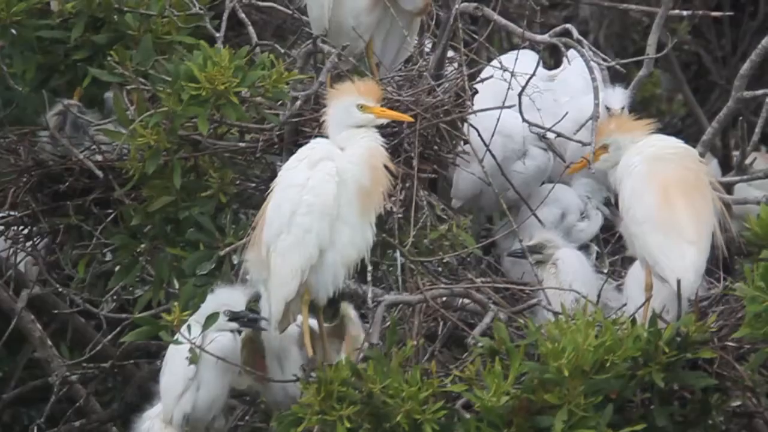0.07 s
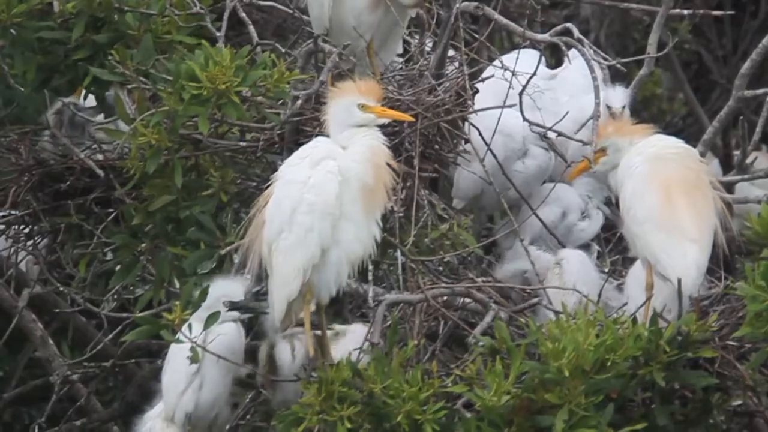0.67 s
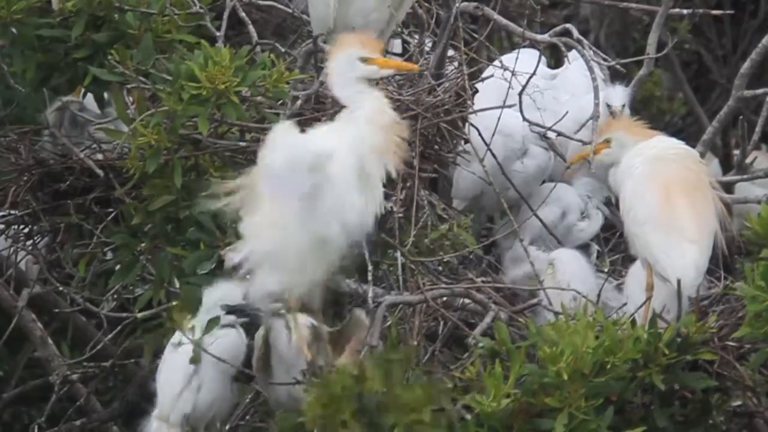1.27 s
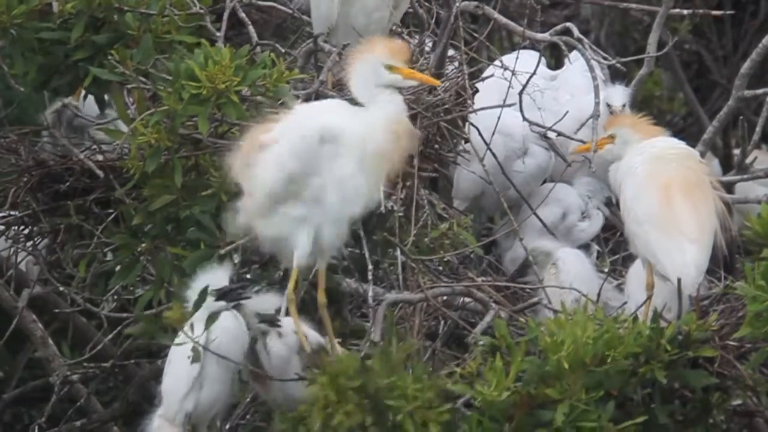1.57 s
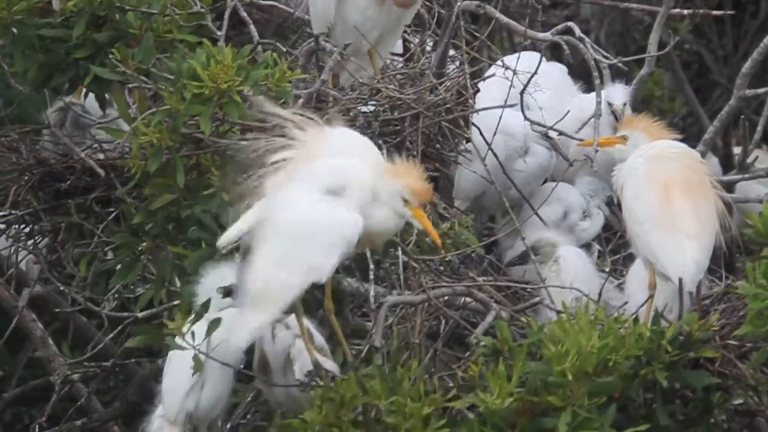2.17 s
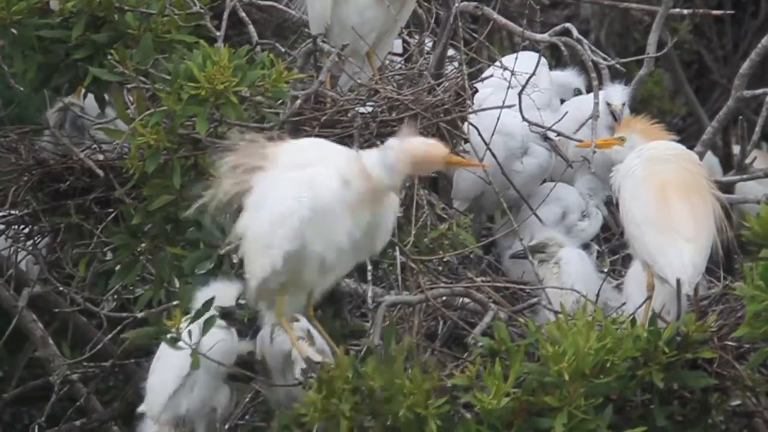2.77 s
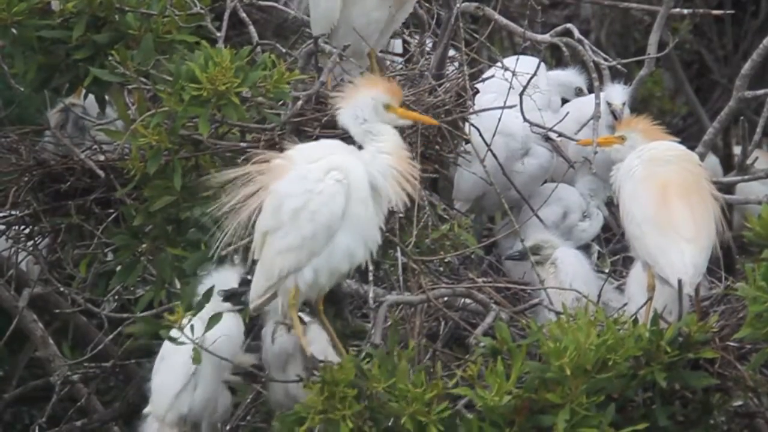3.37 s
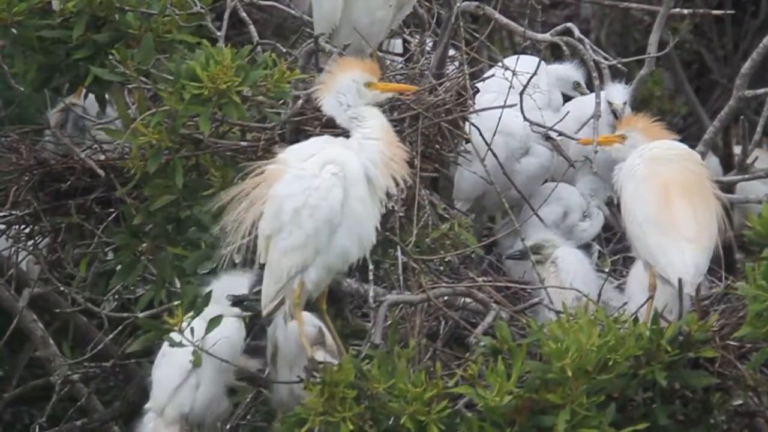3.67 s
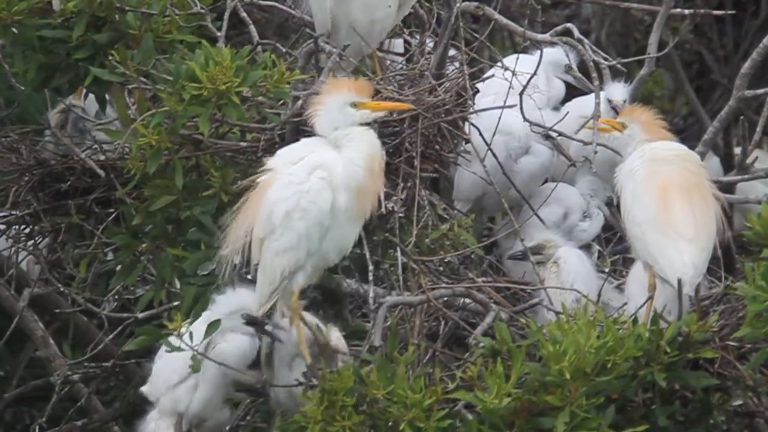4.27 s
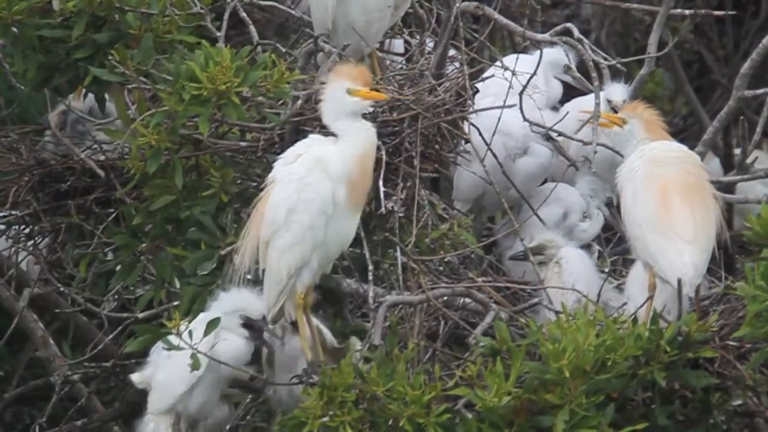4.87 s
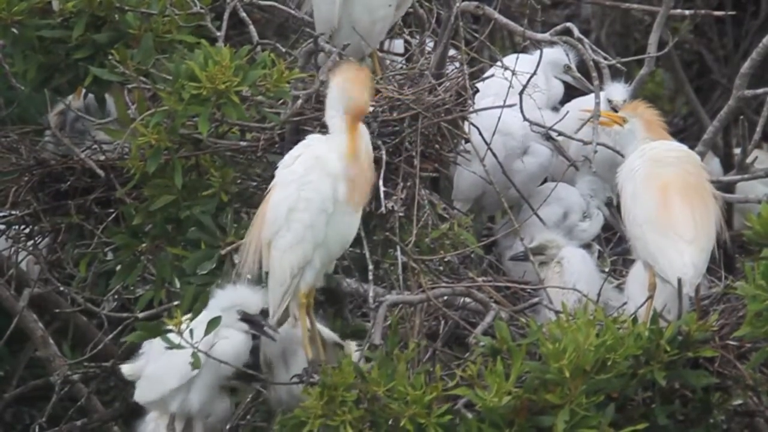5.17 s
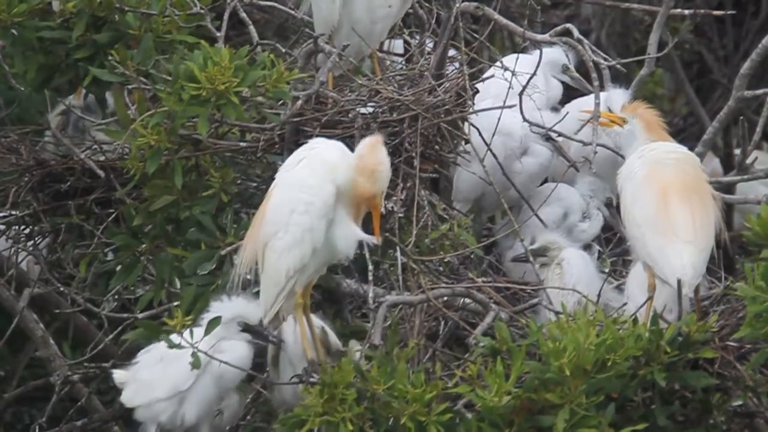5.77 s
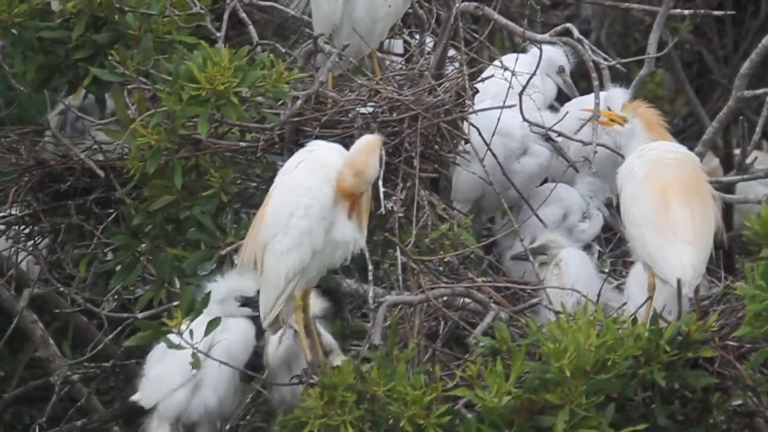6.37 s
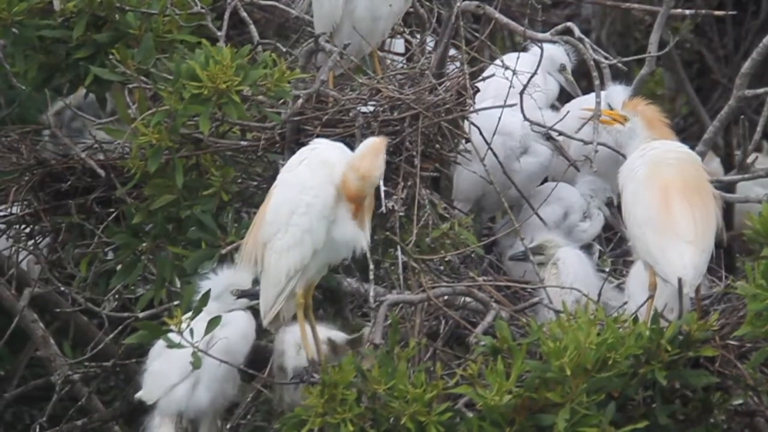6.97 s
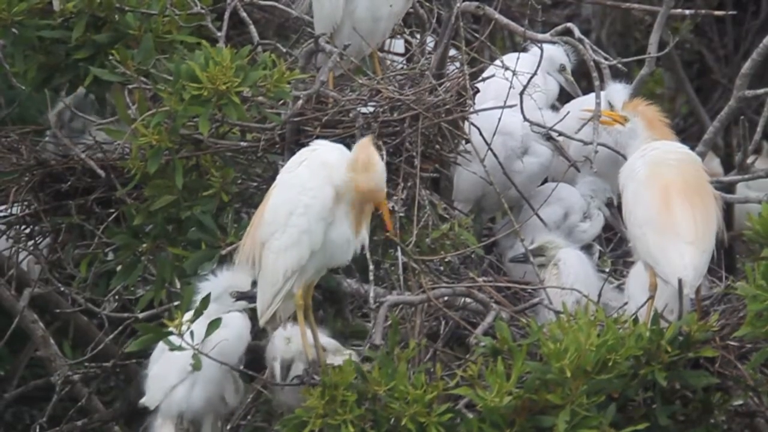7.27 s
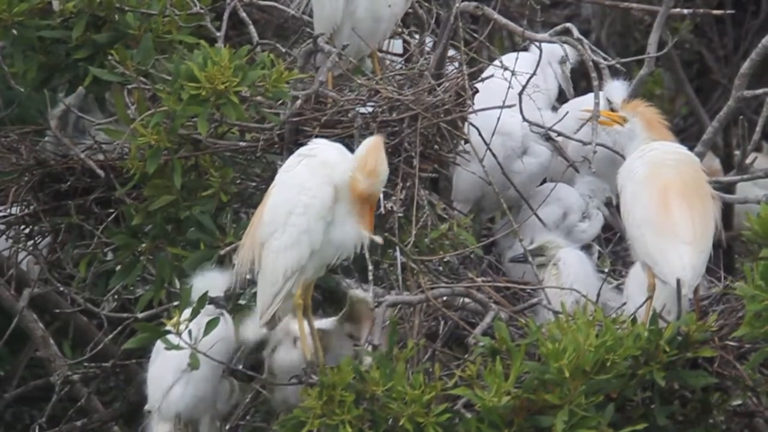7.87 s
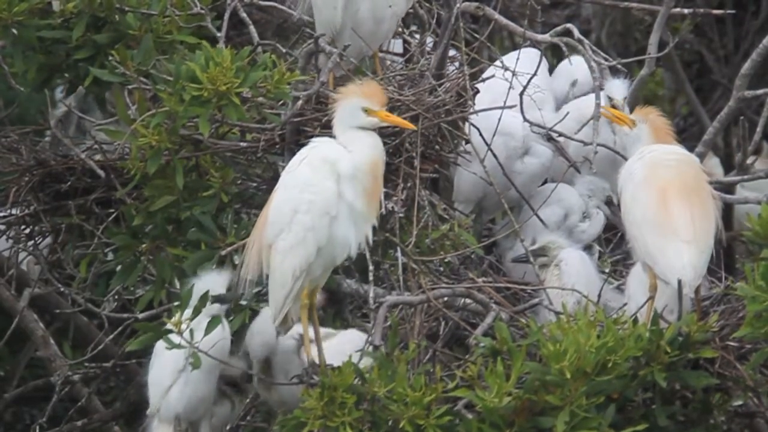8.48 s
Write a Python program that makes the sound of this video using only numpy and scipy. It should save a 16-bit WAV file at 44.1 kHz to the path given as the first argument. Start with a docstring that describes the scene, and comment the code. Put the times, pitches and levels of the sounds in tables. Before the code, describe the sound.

Egret chicks close to the microphone beg with short, overlapping screeches, squeals and thin peeps throughout, in an outdoor thicket. Adults add brief hoarse croaks from deeper in the branches, and farther nests merge into chatter. One harsh scream comes early, then a falling whistle repeats four times. Katydids buzz very high over a steady airy hiss and a faint engine hum, and a distant drone swells in the second half.

```python
"""Egret colony in a thicket

Close to the microphone, chicks squeal, rasp and peep, the slapping membranes of the syrinx roughening
their begging. Adults croak hoarsely from deep in the branches, and farther nests merge into a chatter.
Two katydids scrape their wings at the top of the range; far off, an engine hums and a drone swells."""
import sys
import numpy as np
from scipy import signal
from scipy.fft import rfft, irfft, next_fast_len
from scipy.io import wavfile
from scipy.ndimage import uniform_filter1d, map_coordinates

SR = 44100
rng = np.random.default_rng(int(sys.argv[2]) if len(sys.argv) > 2 else 0)


def inscribe(sig):
    """Save sig as 16-bit PCM at rate SR to the path in sys.argv[1].

    A 1-D sig is mono; a 2-D sig holds one channel per row.
    Samples are clipped to [-1, 1] before scaling.
    """
    pcm = np.round(np.clip(np.atleast_2d(sig).T, -1, 1) * 32767)
    wavfile.write(sys.argv[1], SR, pcm.astype(np.int16))


N = 384552
TIME = np.arange(N) / SR

# Low rumble, open air, a far drone (perhaps traffic) and the chatter of the far nests.
# Each row: frequency in Hz, relative spectral density in dB.
RUMBLE_SPECTRUM = [(20, -19), (45, -6), (62, 1.5), (90, 3), (140, 0.5), (200, -2), (270, -19), (380, -22.5),
                   (800, -25.5)]
AIR_SPECTRUM = [(100, -12), (300, -6), (500, 0.5), (700, -2.5), (1000, -1), (2000, -2), (4000, 2),
                (8300, -16.5), (11500, -51), (13500, -37), (16000, -36)]
DRONE_SPECTRUM = [(30, -24), (60, 4.5), (120, -5), (260, 1), (400, -10), (1000, -9), (2000, -8.5),
                  (4000, -31)]
CHATTER_SPECTRUM = [(700, -38), (1500, -12), (2100, -2.5), (2700, 0), (3400, -5.5), (4400, -7),
                    (5500, -8.5), (7000, -11.5), (8500, -62), (12000, -40)]
# The far drone swells. Each row: time in seconds, level in dB.
DRONE_LEVELS = [(0, -46), (4.5, -45), (6, -40.5), (7.5, -37), (8.7, -38.5)]
# Tones of the distant engine. Each row: frequency in Hz, level in dB.
ENGINE_ORDERS = [(68.1, -43), (113.6, -44.5), (136.3, -41.5), (159, -47.5)]
# Twigs or bills snapping. Each row: start in seconds, level in dB.
SNAP_EVENTS = [(.76, -34), (1.504, -32), (2.302, -36), (5.325, -30)]
# Adult croaks. Each row: start in seconds, low throat resonance in Hz, its width in Hz, its gain in dB,
# second resonance in Hz, relative level in dB.
CROAK_CALLS = [(.256, 1400, 600, 3, 2700, -44), (.335, 1580, 900, -1, 2510, -41),
               (.757, 1350, 500, -1, 2400, -44), (.892, 1040, 250, 2, 2100, -46),
               (1.502, 1130, 450, -3, 2420, -38), (1.659, 1670, 300, 5, 2540, -42.5),
               (1.765, 1110, 400, -1.5, 2800, -41), (2.149, 1500, 600, -5, 2620, -44),
               (2.29, 1210, 240, 3, 2740, -37.5), (2.6, 1270, 400, -2, 2700, -43),
               (3.148, 1170, 280, 2.5, 2760, -40), (3.33, 1900, 700, 1, 2640, -39),
               (3.594, 2040, 700, -4, 2800, -40), (4.111, 1480, 700, -6, 2350, -43.5),
               (4.228, 1600, 400, -4, 2450, -42.5), (4.85, 1610, 600, 1, 3150, -46),
               (5.157, 1500, 700, -4, 2850, -40.5), (5.825, 1790, 600, 4, 2700, -39.5),
               (6.412, 1990, 600, 2, 2330, -43), (6.66, 1350, 500, -1, 3000, -46),
               (6.82, 1800, 800, -5, 2340, -42.5), (7.122, 1900, 650, 0, 2400, -42),
               (7.31, 1340, 400, 9, 2300, -48), (7.69, 1970, 800, -1, 2900, -44)]
# Resonances of an adult's bill, of a chick's throat and bill, and of the tight throat in a scream.
# Each row: frequency in Hz, nominal width in Hz, gain in dB.
BILL_MODES = [(3870, 670, -5.5), (5050, 700, -5), (7000, 4800, -11)]
CHICK_MODES = [(2760, 400, 2), (4060, 400, -9), (5260, 900, -5), (7560, 6300, -10)]
TIGHT_THROAT_MODES = [(2920, 340, -1.5), (3600, 450, -7.5), (4700, 1500, -14)]
# Thin peeps of small chicks, and short nasal yelps.
# Each row: middle in seconds, strongest partial in Hz, relative level in dB.
PEEP_CALLS = [(.315, 6960, -42), (.585, 7340, -44), (1.35, 6730, -40), (1.61, 7130, -46), (2.35, 6900, -44),
              (.825, 7050, -48), (1.125, 6400, -46), (1.84, 7030, -43), (2.125, 6770, -46),
              (2.85, 7450, -41), (2.88, 7000, -41), (3.975, 6260, -46), (4.225, 6260, -46.5),
              (5.91, 6330, -46), (6.575, 6940, -43), (7.925, 7200, -46), (8.48, 7440, -44),
              (3.5, 7060, -44), (4.485, 7360, -39), (4.755, 6940, -47), (6.39, 6850, -42),
              (6.65, 6880, -43), (6.895, 6900, -45), (7.4, 7240, -44), (8.24, 6860, -44)]
YELP_CALLS = [(2.07, 3910, -31.5), (2.175, 3820, -36), (2.405, 4050, -33.5), (2.865, 3970, -35.5),
              (3.08, 4200, -31.5), (4.178, 4180, -38), (4.295, 4300, -40), (4.41, 4440, -41),
              (4.685, 4130, -37), (4.94, 4780, -37.5), (5.043, 4580, -32.5), (6.32, 4330, -41),
              (6.39, 4360, -38), (6.695, 4270, -36), (7.63, 4280, -34), (8.165, 4590, -33),
              (8.505, 4240, -35), (1.835, 4690, -38)]
# Harmonics of the chicks' calls; a screech rings most on its fourth.
# Each row: multiple of the strongest partial, gain in dB.
PEEP_HARMONICS = [(1 / 3, -3), (2 / 3, 0), (1, 0)]
YELP_HARMONICS = [(2 / 3, -11), (1, 0), (4 / 3, -9), (5 / 3, -17)]
SCREECH_HARMONICS = [(2 / 4, -19), (3 / 4, -10), (1, 0), (5 / 4, -7), (6 / 4, -13), (7 / 4, -19)]
# One bird's falling whistle, about every 0.7 s.
# Each row: start in seconds, opening pitch in Hz, relative level in dB.
WHISTLE_CALLS = [(2.515, 3510, -39.5), (3.213, 3540, -42), (3.92, 3130, -41), (4.62, 3370, -44)]
# Mews. Each row: start in seconds, length in seconds, crest pitch in Hz, relative level in dB.
MEW_CALLS = [(1.317, 0.056, 4460, -34.5), (3.384, .13, 2610, -35), (3.645, 0.062, 3560, -34),
             (4.335, .062, 3410, -41.5), (5.045, 0.062, 3425, -30), (5.16, .09, 3470, -35.5),
             (5.294, .108, 2667, -34), (5.82, 0.026, 3350, -32), (6.295, .045, 2490, -39),
             (6.342, .066, 2760, -38), (7.039, .05, 3410, -36), (7.506, .053, 2690, -32)]
# Evenly sliding wails, and hoarse begging screeches. Each row: start in seconds, length in seconds,
# middle pitch in Hz, slide as a share of that pitch, relative level in dB.
WAIL_CALLS = [(0.949, 0.088, 1660, -.16, -42), (1.863, .07, 2620, .07, -37),
              (1.945, 0.08, 2850, -.08, -41.5), (2.236, .036, 5830, .08, -40),
              (4.459, 0.082, 2377, -0.095, -37.5), (5.131, 0.064, 2540, 0.062, -35.5),
              (6.555, 0.065, 3265, 0.058, -35), (6.905, .2, 2497, -.14, -37),
              (7.363, 0.17, 2860, -0.064, -43.5), (8.015, .052, 3230, .12, -37),
              (8.167, .15, 3360, -0.15, -36)]
BEGGING_CALLS = [(.154, 0.067, 4220, .1, -40), (.375, .05, 4060, 0, -37), (.885, .075, 4260, .15, -40.5),
                 (1.088, .1, 4250, -0.038, -39), (1.241, .042, 4070, 0, -39),
                 (1.328, 0.069, 4180, 0, -38.5), (1.569, .08, 4200, -.2, -44.5),
                 (1.83, .13, 2680, .08, -43), (1.848, .064, 3890, .03, -37), (2.364, 0.072, 4080, .08, -40),
                 (2.564, 0.095, 3830, -0.04, -37), (2.788, 0.29, 3830, -.03, -43.5),
                 (3.375, .1, 3950, -0.035, -37), (3.589, .14, 3690, -.15, -36.5),
                 (3.895, 0.21, 4220, -.08, -42.5), (4.152, 0.094, 4100, -.08, -38.5),
                 (4.391, .047, 3970, 0, -35.5), (4.464, .07, 4310, -0.042, -38),
                 (4.662, 0.051, 4300, -.05, -38), (4.717, .049, 4190, 0, -39),
                 (4.856, 0.13, 3460, 0.11, -34.5), (4.942, 0.089, 4130, 0.14, -38),
                 (5.05, .11, 5230, -0.064, -37), (5.13, 0.072, 4050, 0, -35.5),
                 (5.159, .1, 3285, -0.061, -35.5), (5.261, 0.22, 4210, -.03, -43),
                 (5.478, .055, 4230, 0, -36), (5.582, .12, 3605, .05, -37.5), (5.667, 0.05, 4830, .08, -32),
                 (5.694, .11, 3554, -.1, -33.5), (5.805, .12, 5870, .12, -37),
                 (5.957, 0.088, 2565, -0.006, -45), (6.251, 0.082, 4300, 0, -43),
                 (6.467, .12, 4200, -0.089, -35.5), (6.617, .13, 3210, -.15, -40.5),
                 (6.828, 0.032, 7600, 0, -41), (6.995, .11, 3600, -0.018, -39),
                 (7.138, .043, 4550, .05, -40.5), (7.39, 0.062, 4200, 0.014, -38.5),
                 (7.789, .11, 3550, -.18, -37), (7.8, .076, 5830, .05, -41.5),
                 (7.935, 0.045, 4290, -0.029, -38), (8.519, 0.069, 4200, -0.042, -40.5)]
# The microphone fades up. Each row: time in seconds, gain in dB.
INPUT_GAIN = [(0, -76), (.118, -70), (.125, -23), (.15, -12.5), (.19, -4), (.23, -3)]


def from_db(db):
    """Decibels to gain."""
    return 10 ** (np.asarray(db) / 20)


def rms_one(x):
    """Scale to unit rms."""
    return x / np.sqrt(np.mean(x ** 2) + 1e-20)


def steady(x):
    """Even out the level from one few milliseconds to the next; rms 1."""
    power = uniform_filter1d(rms_one(x) ** 2, size=300)
    return rms_one(x / np.sqrt(power + .05))


def gain_curve(rows):
    """Gain through the scene from (seconds, dB) points."""
    return from_db(np.interp(TIME, *np.transpose(rows)))


def colour(x, spectrum):
    """Give a sound a broad spectrum; rms 1."""
    hz, db = np.transpose(spectrum)
    bins = np.maximum(np.fft.rfftfreq(len(x), 1 / SR), 1)
    gain = from_db(np.interp(np.log(bins), np.log(hz), db))
    return rms_one(irfft(rfft(x) * gain, len(x)))


def drift(size, rate):
    """Smooth random curve with spread about 1 and `rate` new values a second."""
    at = np.arange(size) / SR * rate
    return map_coordinates(rng.standard_normal(int(at[-1]) + 4), [at + 1], order=2, mode="nearest")


def hops(size, rate):
    """Random curve that holds, then jumps, about `rate` times a second; spread 1."""
    held = np.cumsum(rng.random(size) < rate / SR)
    return uniform_filter1d(np.sqrt(3) * rng.uniform(-1, 1, size + 1)[held], size=40)


def cycles(hz):
    """Running count of cycles of a pitch curve."""
    return np.cumsum(hz) / SR


def resonate(x, hz, width):
    """Two-pole resonance with gain 1 at its peak."""
    r = np.exp(-np.pi * width / SR)
    feedback = [1, -2 * r * np.cos(2 * np.pi * hz / SR), r * r]
    return signal.lfilter(np.array([1, 0, -1]) * (1 - r * r) / 2, feedback, x)


def swell(length, attack, release):
    """Progress u, 0-1 through a call, and its envelope with rounded ends; times in seconds."""
    t = np.arange(int((max(length, .01) + release / 2) * SR)) / SR
    edges = np.clip(t / attack, 0, 1) * np.clip((t[-1] - t) / release, 0, 1)
    return t / t[-1], np.sin(edges * np.pi / 2) ** 2


def add(out, s, sound):
    """Mix a sound in at `s` seconds."""
    i = int(np.clip(s * SR, 0, N))
    out[i:i + len(sound)] += sound[:N - i]


def thicket(x, t60, dull_hz):
    """Many small echoes off branches and leaves, from a response of unit energy."""
    t = np.arange(SR // 2) / SR
    echoes = rng.standard_normal(len(t)) * (rng.random(len(t)) < .05)
    echoes *= (t > .003) * from_db(-60 * t / t60)
    echoes = signal.sosfilt(signal.butter(1, dull_hz, fs=SR, output="sos"), echoes)
    return signal.fftconvolve(x, echoes / np.linalg.norm(echoes))[:N]


def open_air(rumble_db=-39.5, air_db=-38.0):
    """Noise from beyond the thicket: a swelling drone over steady rumble and air."""
    drone = gain_curve(DRONE_LEVELS) * colour(rng.standard_normal(N), DRONE_SPECTRUM)
    rumble = from_db(rumble_db) * colour(rng.standard_normal(N), RUMBLE_SPECTRUM)
    air = from_db(air_db) * colour(rng.standard_normal(N), AIR_SPECTRUM)
    return drone + rumble + air


def engine(wander_hz=.55, throb_db=1.0):
    """Low orders of a far engine, wavering on their way through the air."""
    out = np.zeros(N)
    for hz, db in ENGINE_ORDERS:
        amplitude = np.sqrt(2) * from_db(db + throb_db * drift(N, 9))
        out += amplitude * np.sin(2 * np.pi * cycles(hz + wander_hz * drift(N, 6)))
    return out


def katydid(stroke_hz, top_hz, level_db, scatter, rise_hz=1250, fall_hz=1900, peak_at=.42, spread=.3):
    """Each wing stroke drags a scraper over a file; the tooth rate follows the wing's speed."""
    stroke = cycles(stroke_hz * (1 + .015 * drift(N, 25))) % 1
    before_peak = rise_hz * (1 - stroke / peak_at) ** 2
    after_peak = fall_hz * ((stroke - peak_at) / (1 - peak_at)) ** 2
    tooth_hz = top_hz - np.where(stroke < peak_at, before_peak, after_peak) + 85 * drift(N, 350)
    pressure = np.exp(-.5 * ((stroke - peak_at) / spread) ** 2) * np.sqrt(np.abs(np.sin(np.pi * stroke)))
    song = pressure * from_db(.8 * drift(N, 70)) * np.sin(2 * np.pi * cycles(tooth_hz))
    return from_db(level_db) * rms_one(song + scatter * thicket(song, t60=.98, dull_hz=12500))


def far_nests(count=140, level_db=-42.0, hiss_db=-44.5):
    """Many distant chicks yapping at random, the farthest merged into a hiss."""
    yaps = np.zeros(N)
    for k, (when, long, high, fall, loud) in enumerate(rng.random((count, 5))):
        u, envelope = swell(.02 + .035 * long, .004, .02)
        hoarse = .026 * drift(len(u), 1100)
        pitch = (2900 + 2100 * high) * (1 + .04 * np.sin(np.pi * u) + (.06 - .18 * fall) * u + hoarse)
        phase = 2 * np.pi * cycles(pitch)
        call = np.sin(phase) + .5 * np.sin(2 * phase / 3) + .6 * np.sin(4 * phase / 3)
        add(yaps, (k + when) / count * N / SR, from_db(4 * loud) * envelope * call)
    ebb = from_db(1.8 * drift(N, 22))
    hiss = ebb * colour(rng.standard_normal(N), CHATTER_SPECTRUM)
    chatter = colour(yaps + thicket(yaps, t60=.059, dull_hz=8000), CHATTER_SPECTRUM)
    return from_db(level_db) * chatter + from_db(hiss_db) * hiss


def strays(count, hz, spread, db, scatter_db=2):
    """Softer calls from the nests around, one in each equal stretch of time, as (seconds, Hz, dB)."""
    return [((k + when) / count * N / SR,
             hz * np.exp(spread * (2 * high - 1)),
             db + scatter_db * (2 * loud - 1))
            for k, (when, high, loud) in enumerate(rng.random((count, 3)))]


def snaps(decay_s=.005):
    """Twigs or bills crack in dry, broadband bursts."""
    out, t = np.zeros(N), np.arange(SR // 20) / SR
    for s, db in SNAP_EVENTS:
        crack = rms_one(resonate(rng.standard_normal(len(t)), hz=3400, width=4500))
        add(out, s, from_db(db) * np.exp(-t / decay_s) * crack)
    return out


def syrinx(size, pulse_hz, jitter, breath):
    """Uneven slaps of the membranes, each letting a puff of air through."""
    turn = cycles(pulse_hz * np.exp(jitter * drift(size, 300)))
    slaps = np.diff(np.floor(turn), prepend=0) * from_db(drift(size, 395))
    puffs = rng.standard_normal(size) * np.exp(-3 * (turn % 1))
    return rms_one(rms_one(slaps) + breath * rms_one(puffs))


def throat(source, modes):
    """Resonances of throat and bill in parallel, signs alternating."""
    return sum((-1) ** k * from_db(db) * resonate(source, hz, width)
               for k, (hz, width, db) in enumerate(modes))


def croaks(second_width_hz=330, gape=.041, gain_db=7.0, deepen_db=7, band_hz=(750, 7000)):
    """Adults' rough pulse trains start abruptly in the bill and end ringing low in the long throat."""
    out = np.zeros(N)
    for s, low_hz, low_width, low_db, second_hz, db in CROAK_CALLS:
        u, envelope = swell(length=.046, attack=.001, release=.022)
        source = syrinx(len(u), pulse_hz=240, jitter=.16, breath=.4)
        build = np.exp(.05 * rng.standard_normal())  # bills vary in size
        bill = [(hz * build, width, gain) for hz, width, gain in BILL_MODES]
        deepen = from_db(deepen_db * (u - .5) / 2)
        upper = throat(source / deepen, [(second_hz, second_width_hz, 0)] + bill)
        lower = from_db(low_db) * resonate(source * deepen, low_hz, low_width)
        opening = np.sin(np.pi * u) - 2 / np.pi  # resonances rise and fall with the bill
        voice = map_coordinates(steady(upper - lower), [np.cumsum(1 + gape * opening)], order=3)
        add(out, s, from_db(db + gain_db) * envelope * voice)
    out = signal.sosfilt(signal.butter(2, band_hz, "band", fs=SR, output="sos"), out)
    return out + .75 * thicket(out, t60=.042, dull_hz=7950)  # the adults perch deep among the branches


def peeps(notes, harmonics, length, arch, rough, gain_db):
    """Chicks' peeps and yelps: tiny arched notes with a few harmonics."""
    out = np.zeros(N)
    for s, hz, db in notes:
        u, envelope = swell(length, .008, .022)
        slide = rng.normal(0, .02) * (u - .5)
        pitch = hz * (1 + slide - arch * (2 * u - 1) ** 2 + rough * drift(len(u), 913))
        phase = 2 * np.pi * cycles(pitch)
        voice = sum(from_db(gain) * np.sin(multiple * phase) for multiple, gain in harmonics)
        add(out, s - length / 2, from_db(db + gain_db) * envelope * voice)
    return out


def squeal(length, glide, rough=.014, octave_db=-20):
    """A nearly pure glide with a trembling pitch and a weak octave; `glide` gives Hz from progress."""
    u, envelope = swell(length, .005, .012)
    tremble = .007 * drift(len(u), 30) + .008 * drift(len(u), 130) + rough * drift(len(u), 1100)
    surge_db = 3 * np.sin(np.pi * u) + 1.8 * drift(len(u), 35) + 1.6 * drift(len(u), 160)
    phase = 2 * np.pi * cycles(glide(u) * (1 + tremble))
    tone = np.sin(phase) + from_db(octave_db) * np.sin(2 * phase)
    return envelope * rms_one(tone * from_db(surge_db))


def squeals(gain_db=1.6, end_hz=2080, drop_at=.42, drop_span=.21, crest_at=.298, bend=.3):
    """Clear calls: whistles that hold, drop and level out, mews that crest early, and sliding wails."""
    out = np.zeros(N)
    for s, top_hz, db in WHISTLE_CALLS:
        fall = lambda u: end_hz + (top_hz - end_hz) * (1 - np.tanh((u - drop_at) / drop_span)) / 2
        add(out, s, from_db(db) * squeal(length=.15, glide=fall, rough=.028))
    for s, length, hz, db in MEW_CALLS:
        add(out, s, from_db(db) * squeal(length, lambda u: hz * (1 - bend * (u - crest_at) ** 2)))
    for s, length, hz, slide, db in WAIL_CALLS:
        add(out, s, from_db(db) * squeal(length, lambda u: hz * (1 + slide * (u - .5))))
    return from_db(gain_db) * out


def scream(level_db=-29.5, arch=.07, sag_db=5.5):
    """Chaotic slaps ringing in a tight throat; pitch and level arch with the effort."""
    u, envelope = swell(length=.32, attack=.01, release=.02)
    source = syrinx(len(u), pulse_hz=420, jitter=.3, breath=1)
    voice = sum(from_db(db) * rms_one(resonate(resonate(source, hz, width), hz, width))
                for hz, width, db in TIGHT_THROAT_MODES)
    slack = (2 * u - 1) ** 2
    voice = map_coordinates(steady(voice), [np.cumsum(1 - arch * slack ** 2)], order=3)
    return from_db(level_db - sag_db * slack) * envelope * rms_one(voice)


def screech(length, hz, slide, rough=.3, pulse_hz=370, squeeze=.29, chaos=.363,
            rasp_db=-4.5, ring_db=-6.0, open_hz=1400, arch_db=4):
    """A forced squeal: slapping membranes chop it into side tones, and the pitch keeps breaking."""
    u, envelope = swell(length, .004, .02)
    size = len(u)
    width_hz = .235 * hz  # higher calls are broader
    effort = np.sin(np.pi * u) - 2 / np.pi  # pitch and level crest in mid-call
    wobble = .1 * hops(size, 60) + .2 * rough ** 2 * drift(size, 400)
    slap_hz = pulse_hz * np.exp(.15 * rng.standard_normal() + wobble)  # every chick has its own rate
    membrane = np.sin(2 * np.pi * cycles(slap_hz))
    centre_hz = hz * (1 + slide * (u - .5)) * (1 + .02 * effort + .035 * hops(size, 90))
    swing_hz = width_hz * (squeeze * membrane + chaos * rough * drift(size, width_hz))
    phase = 2 * np.pi * cycles(centre_hz + swing_hz)
    harmonics = sum(from_db(gain) * np.sin(multiple * phase) for multiple, gain in SCREECH_HARMONICS)
    tone = rms_one((1 + membrane / 2) * harmonics)
    slaps = syrinx(size, slap_hz, jitter=.12 * rough, breath=1.5 * rough)
    rasp = rms_one(resonate(resonate(slaps, hz, 2 * width_hz), hz, 2 * width_hz))
    build = np.exp(.05 * rng.standard_normal())
    # a chick's narrow bill rings longer
    modes = [(mode_hz * build, width / 2, db) for mode_hz, width, db in CHICK_MODES]
    ring = width_hz / open_hz * rms_one(throat(slaps, modes))  # broad calls set the whole throat ringing
    voice = steady(tone + from_db(rasp_db) * rasp + from_db(ring_db) * ring)
    flutter_db = 1.7 * drift(size, 180)
    return envelope * rms_one(voice * from_db(arch_db * effort + flutter_db))


def begging_chicks(gain_db=5, dull_cut_hz=8000, stray_length=.064, scream_at_s=.375):
    """Screeches and one long scream from the nests nearest the microphone, their highest treble dulled a
    little."""
    out = np.zeros(N)
    soft = [(s, stray_length, hz, 0, db) for s, hz, db in strays(count=18, hz=3500, spread=.28, db=-46.5)]
    for s, length, hz, slide, db in BEGGING_CALLS + soft:
        add(out, s, from_db(db + gain_db) * screech(length, hz, slide))
    add(out, scream_at_s, scream())
    return signal.sosfilt(signal.butter(2, dull_cut_hz, fs=SR, output="sos"), out)


def scene(echo_db=-13.0):
    """One microphone at the thicket: birds and their echoes over insects, the engine and open air."""
    yelp_notes = YELP_CALLS + strays(count=22, hz=4200, spread=.22, db=-48)
    peep_notes = PEEP_CALLS + strays(count=18, hz=6400, spread=.14, db=-52)
    yelps = peeps(yelp_notes, YELP_HARMONICS, length=.032, arch=.05, rough=.033, gain_db=5.5)
    thin_peeps = peeps(peep_notes, PEEP_HARMONICS, length=.036, arch=.016, rough=.008, gain_db=3)
    birds = squeals() + begging_chicks() + croaks() + yelps + thin_peeps + far_nests() + snaps()
    echoes = from_db(echo_db) * thicket(birds, t60=.39, dull_hz=6100)
    near_insect = katydid(stroke_hz=73.15, top_hz=10702, level_db=-31.5, scatter=.45)
    far_insect = katydid(stroke_hz=70.75, top_hz=10334, level_db=-38.0, scatter=.52)
    return (birds + echoes + near_insect + far_insect + engine() + open_air())[None]


def record(dry, cutoff_hz=15700):
    """The microphone input fades up and the highest treble is cut."""
    size = next_fast_len(N + SR)
    spectrum = rfft(dry * gain_curve(INPUT_GAIN), size)
    below_cutoff = np.fft.rfftfreq(size, 1 / SR) < cutoff_hz
    return irfft(spectrum * below_cutoff, size)[:, :N]


dry = scene()
out = record(dry)
inscribe(out)
```